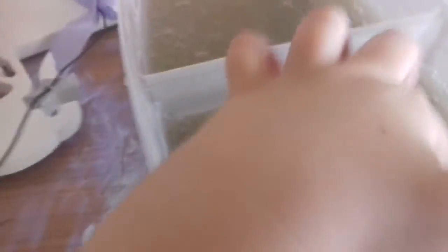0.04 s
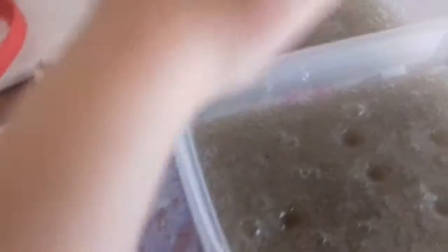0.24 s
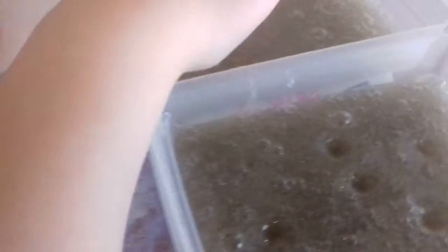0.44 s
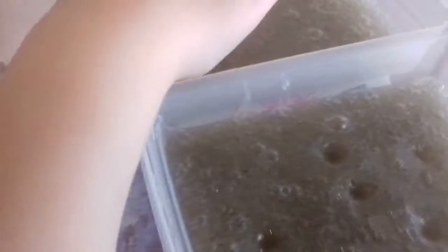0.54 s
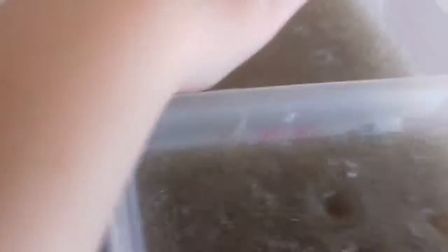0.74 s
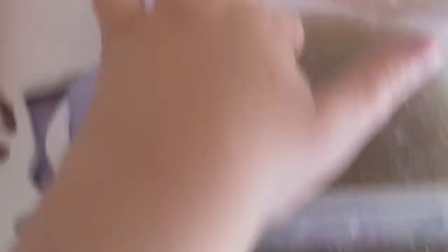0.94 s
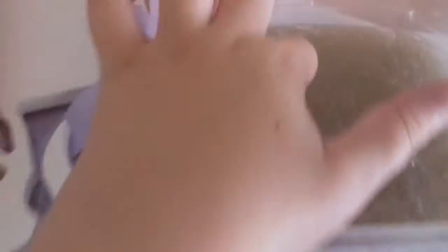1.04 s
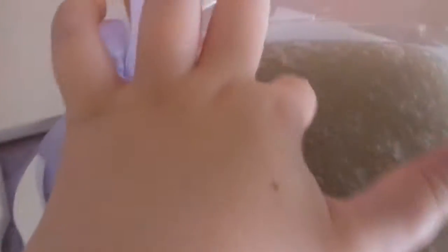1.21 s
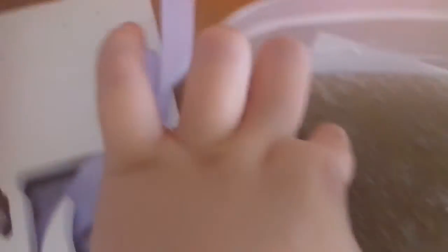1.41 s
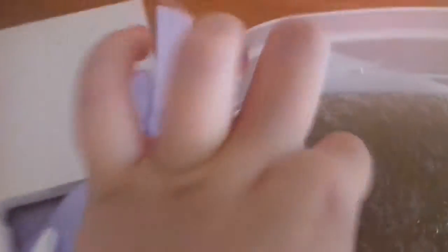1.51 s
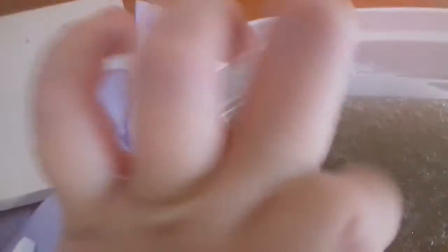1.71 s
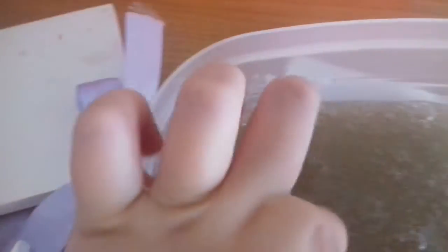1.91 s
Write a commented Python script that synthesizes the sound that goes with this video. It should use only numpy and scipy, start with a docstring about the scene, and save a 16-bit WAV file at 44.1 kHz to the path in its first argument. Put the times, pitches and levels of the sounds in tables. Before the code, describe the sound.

Slime air pockets snap in a plastic tub, first a single hard click, later a rapid burst

```python
"""Sticky slime pressed by hand in a plastic tub, close to the microphone in a small quiet room.
Air pockets snap as short filtered clicks that scatter between the tub's walls.
The hardest presses also knock the hollow tub, heard as decaying sine modes with a noisy thud.
Skin rubs softly over the plastic before and after the second press: grainy noise through resonances.
Behind it lie a short room tail, steady room tone and microphone hiss."""
import sys
import numpy as np
from scipy import signal
from scipy.fft import rfft, irfft
from scipy.io import wavfile

SR = 44100
rng = np.random.default_rng(int(sys.argv[2]) if len(sys.argv) > 2 else 0)


def materialize(psi):
    """Save the field psi as 16-bit PCM at rate SR to the path in sys.argv[1].

    A 1-D psi becomes a single channel; in a 2-D psi each row is a channel.
    """
    bounded = np.clip(np.atleast_2d(psi).T, -1, 1)
    quanta = np.round(bounded * 32767).astype(np.int16)
    wavfile.write(sys.argv[1], SR, quanta)


N = 85995  # length in samples

# Air pockets snapping in the slime, levels before dulling: (time [s], pop level [dB], pop pitch [Hz],
# pop filter width [Hz], smack level [dB], fizz level [dB], fizz pitch [Hz])
AIR_POCKETS = [(0.1341, -9.5, 3160, 1390, -43, -39.5, 6540), (.1430, -4.5, 3000, 2380, -19.5, -36.5, 6960),
               (0.1621, -19.5, 2640, 2000, -25, -38, 7000), (.1703, 11, 2930, 1920, 1, -30.5, 11500),
               (0.1715, 5, 1730, 1340, -9.5, -28, 6500), (1.099, -43, 3600, 2500, -58, -44, 7040),
               (1.1636, -27, 3770, 1500, -48, -39.5, 7500), (1.174, -22, 2900, 1800, -57, -40, 7000),
               (1.331, -28, 2920, 2530, -50, -41, 12600), (1.3903, -10, 1670, 415, -36, -63, 7060),
               (1.3905, -14.5, 3310, 780, -60, -49, 6950), (1.5861, -4.5, 3050, 1880, -23, -58, 6960),
               (1.5875, -1, 1390, 595, -43, -57, 7100), (1.5926, 1.5, 2920, 1590, -20.5, -36, 6940),
               (1.5941, 0.5, 3450, 2110, -12, -49, 7300), (1.5986, -12, 3520, 1820, -14, -31, 7000),
               (1.6135, -12.5, 3450, 2220, -36, -38, 7800), (1.6185, -14, 3000, 2400, -14, -38, 7400),
               (1.6254, -10, 1680, 1200, -17.5, -48, 7000), (1.6293, -1, 2540, 2640, -11, -57, 7500),
               (1.6325, -10, 3440, 2170, -7, -57, 7000), (1.6560, 3, 2130, 870, -27, -54, 7000),
               (1.6577, -5, 3930, 1230, -47, -61, 7000)]
SMACK_HZ, SMACK_WIDTH_HZ, FIZZ_WIDTH_HZ = 1020, 1530, 2900
# Echoes between the tub's walls: energy against the direct snap, decay constant, first arrival
SCATTER_DB, SCATTER_DECAY_S, SCATTER_LAG_S = 0.5, 0.0024, 0.00042

# Knocks on the tub: (time [s], level [dB], most strongly driven pitch [Hz], spread of drive [octaves])
TUB_KNOCKS = [(0.1697, -26.5, 407, 0.76), (.178, -41, 101, 0.27), (1.59, -39.5, 118, 1.05),
              (1.6185, -39.5, 420, 0.8), (1.6288, -27.5, 167, 1.1), (1.6565, -35, 480, 0.88),
              (1.664, -31.5, 243, 0.58), (1.845, -57, 436, 1), (1.861, -50, 156, 0.6)]
# Modes of the tub's body, damped by the slime: (frequency [Hz], relative level [dB], t60 [s])
TUB_MODES = [(88.6, -23, 0.34), (123.8, -13, 0.15), (175, -7, .11), (221.3, -6.5, 0.11),
             (307, -11.5, 0.041), (337.9, -1.5, 0.083), (473.4, 1, 0.039), (557, -6.5, 0.076),
             (621, -30.5, 0.045)]
# Thud level relative to the knock, its decay constant, and the rise constant of both
THUD_DB, THUD_DECAY_S, KNOCK_RISE_S = -13.5, 0.014, 0.002

# Skin rubbing on the tub, levels at the strongest moment:
# (start [s], strongest [s], end [s], hiss level [dB], rumble level [dB])
SKIN_RUBS = [(1.401, 1.561, 1.568, -56, -66), (1.712, 1.855, 1.962, -58, -69)]
# Resonances of the rubbed plastic: (frequency [Hz], width [Hz], relative level [dB])
PLASTIC_RESONANCES = [(520, 370, -4), (1750, 390, 3), (2576, 184, 4), (3680, 140, -10.5)]
# Level drop at a rub's start and end, and the dB step that scales the random grain strength
RUB_RANGE_DB, RUMBLE_RANGE_DB, RUB_GRAIN_DB = 17.5, 26, 3.5
RUMBLE_HZ = 101  # centre and filter width

# Tone of the close pops, smacks and rubs, mostly dulled above 4 kHz: (frequency [Hz], gain [dB])
CLOSE_DULLING = [(30, -10), (100, 1), (3000, -4.5), (4250, -3.5), (4800, -10), (5500, -10.5), (6300, -23),
                 (9000, -26.5), (16000, -25)]
BASS_CUT_HZ = 75

# Colour of the room's tail: (frequency [Hz], relative gain [dB])
ROOM_TAIL_COLOUR = [(60, -19), (130, -3), (230, 3), (400, 3), (550, -2.5), (850, -4), (1200, -3.5),
                    (1600, 0.5), (2500, -7.5), (4000, -5), (6000, -2), (16000, -18)]
ROOM_DB, ROOM_T60_S, ROOM_LAG_S = -10.5, 0.25, 0.00518
ROOM_WIDTH = 0.04  # gain of the difference between channels, against their common part

# Spectrum of the room tone: (frequency [Hz], relative density [dB per Hz])
AIR_SPECTRUM = [(20, -40), (50, -7), (75, -3.5), (110, 1), (165, -0.5), (250, -1), (370, -0.5), (700, -5.5),
                (2000, -11), (3800, -19.5), (5000, -46.5), (16000, -37)]
# Spectrum of the microphone hiss: (frequency [Hz], relative density [dB per Hz])
HISS_SPECTRUM = [(40, -9), (200, 12), (3000, 5.5), (5500, -5), (8500, -2), (10000, -9.5), (11500, -2),
                 (16000, -6.5)]
AIR_DB, HISS_DB = -70.5, -69  # rms levels

TOP_HZ = 15800  # upper edge of the recorder's passband


def amp(db):
    """Decibels to gain."""
    return 10 ** (np.asarray(db) / 20)


def unit(x):
    """Scale to an rms of 1."""
    return x / np.sqrt(np.mean(x ** 2))


def band(x, hz, width_hz):
    """A two-pole resonance with gain 1 at its centre; the width is capped at SR / 4."""
    b, a = signal.iirpeak(hz, hz / min(width_hz, SR / 4), fs=SR)
    return signal.lfilter(b, a, x)


def double_band(x, hz, width_hz):
    """The same resonance passed twice, for steeper sides and a softer onset."""
    return band(band(x, hz, width_hz), hz, width_hz)


def colour(x, points):
    """A causal minimum-phase filter through (frequency [Hz], gain [dB]) points."""
    hz, db = np.array(points).T
    size = 4096
    grid = np.maximum(np.arange(size // 2 + 1) * SR / size, 1)
    gain = amp(np.interp(np.log(grid), np.log(hz), db))
    # folding the cepstrum onto positive times gives minimum phase
    cepstrum = irfft(np.log(gain))
    cepstrum[1:size // 2] *= 2
    cepstrum[size // 2 + 1:] = 0
    impulse = irfft(np.exp(rfft(cepstrum)))
    return signal.fftconvolve(x, impulse)[:len(x)]


def add(track, start_s, sound):
    """Mix a sound into a track at a given time."""
    i = int(start_s * SR)
    track[i:i + len(sound)] += sound[:max(N - i, 0)]


def reflections(t, lag_s, decay_s):
    """Dense echoes of unit energy that start after a lag and die away."""
    echoes = rng.standard_normal(len(t)) * np.exp(-t / decay_s) * (t > lag_s)
    return echoes / np.sqrt(np.sum(echoes ** 2))


def pops():
    """Each pocket rings for a few cycles over a wet smack and a thin fizz, then scatters in the tub."""
    out, t = np.zeros(N), np.arange(SR // 20) / SR
    snap = signal.unit_impulse(len(t))
    smack = double_band(snap, SMACK_HZ, SMACK_WIDTH_HZ)
    for start, pop_db, hz, width_hz, smack_db, fizz_db, fizz_hz in AIR_POCKETS:
        fizz = double_band(snap, fizz_hz, FIZZ_WIDTH_HZ)
        ring = double_band(snap, hz, width_hz)
        # the smack has opposite polarity to the ring
        dulled = colour(amp(pop_db) * ring - amp(smack_db) * smack, CLOSE_DULLING)
        pop = dulled + amp(fizz_db) * fizz
        walls = snap + amp(SCATTER_DB) * reflections(t, SCATTER_LAG_S, SCATTER_DECAY_S)
        add(out, start, signal.fftconvolve(pop, walls))
    return out


def knocks():
    """A press swells into the tub's modes around one pitch, with a short dead thud from the slime."""
    out, t = np.zeros(N), np.arange(SR // 2) / SR
    for start, db, centre_hz, octaves in TUB_KNOCKS:
        body = np.zeros(len(t))
        for hz, mode_db, t60 in TUB_MODES:
            drive = np.exp(-0.5 * (np.log2(hz / centre_hz) / octaves) ** 2)
            decay = amp(mode_db - 60 * t / t60)
            body += drive * decay * np.sin(2 * np.pi * hz * t)
        noise = rng.standard_normal(len(t))
        thud = unit(double_band(noise, centre_hz, 2 * centre_hz * octaves))
        thud = amp(THUD_DB) * thud * np.exp(-t / THUD_DECAY_S)
        swell = 1 - np.exp(-t / KNOCK_RISE_S)
        add(out, start, amp(db) * swell * (body + thud))
    return out


def rubs():
    """Fine stick-slip grains excite the plastic as pressure builds and eases; the tub rumbles under it."""
    t = np.arange(N) / SR
    hiss_gain, rumble_gain = np.zeros(N), np.zeros(N)
    for start, top, end, hiss_db, rumble_db in SKIN_RUBS:
        slack = np.interp(t, [start, top, end], [1, 0, 1])  # 0 at the strongest pressure
        touching = (t > start) & (t < end)
        hiss_gain += touching * amp(hiss_db - RUB_RANGE_DB * slack)
        rumble_gain += touching * amp(rumble_db - RUMBLE_RANGE_DB * slack)
    noise = rng.standard_normal(N)
    grain_strength = np.minimum(rng.exponential(size=N), 2)
    grains = noise * amp(RUB_GRAIN_DB * grain_strength)
    ringing = sum(amp(db) * band(grains, hz, width) for hz, width, db in PLASTIC_RESONANCES)
    plastic = colour(ringing, CLOSE_DULLING)
    rumble = double_band(rng.standard_normal(N), RUMBLE_HZ, RUMBLE_HZ)
    return hiss_gain * unit(plastic) + rumble_gain * unit(rumble)


def room(x):
    """The small room's short tail of dense echoes, nearly alike in both channels."""
    t = np.arange(SR // 2) / SR
    wet = colour(x, ROOM_TAIL_COLOUR)
    decay_s = ROOM_T60_S / np.log(1000)  # t60 to decay constant
    mid = signal.fftconvolve(wet, reflections(t, ROOM_LAG_S, decay_s))[:N]
    side = signal.fftconvolve(wet, reflections(t, ROOM_LAG_S, decay_s))[:N]
    left_right = np.array([[1], [-1]])
    return amp(ROOM_DB) * (mid + ROOM_WIDTH * side * left_right)


def background():
    """Steady coloured noise: room tone shared by both channels and separate microphone hiss in each."""
    air = unit(colour(rng.standard_normal(N), AIR_SPECTRUM))
    hiss = np.array([unit(colour(rng.standard_normal(N), HISS_SPECTRUM)) for _ in range(2)])
    return amp(AIR_DB) * air + amp(HISS_DB) * hiss


def scene():
    """Slime, tub and hand in the centre, with the room around them; the small tub radiates no deep bass."""
    bass_cut = signal.butter(4, BASS_CUT_HZ, "high", fs=SR, output="sos")
    near = signal.sosfilt(bass_cut, pops() + knocks() + rubs())
    return near + room(near) + background()


def record(dry):
    """The recorder cuts the top with a steep low-pass."""
    top_cut = signal.ellip(10, 0.2, 70, TOP_HZ, fs=SR, output="sos")
    return signal.sosfilt(top_cut, dry)


dry = scene()
out = record(dry)
materialize(out)
```